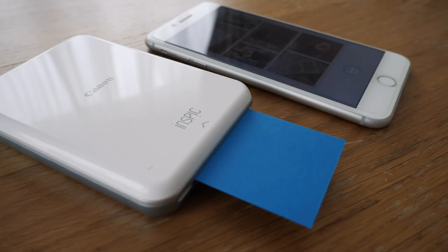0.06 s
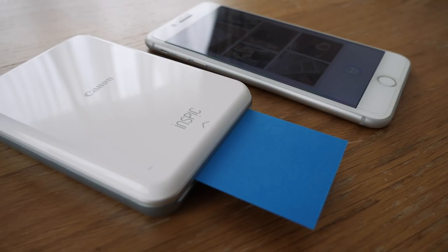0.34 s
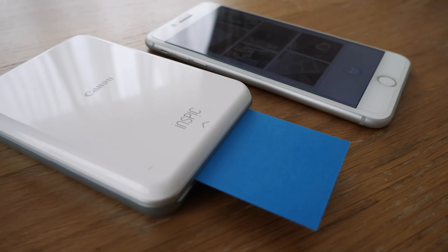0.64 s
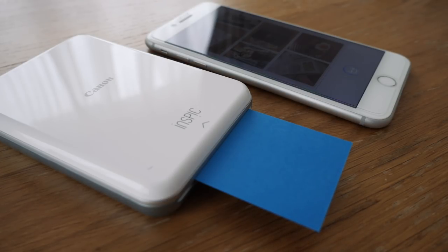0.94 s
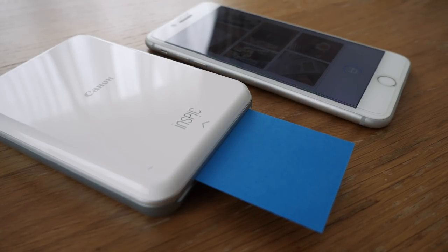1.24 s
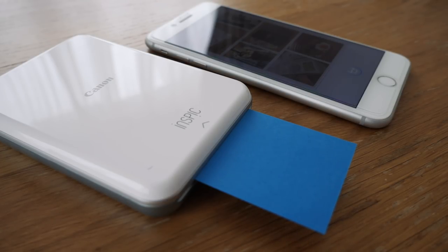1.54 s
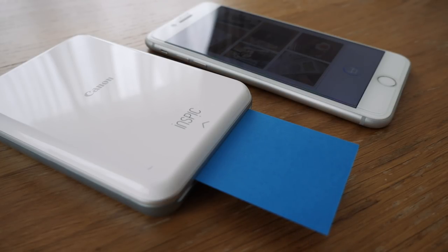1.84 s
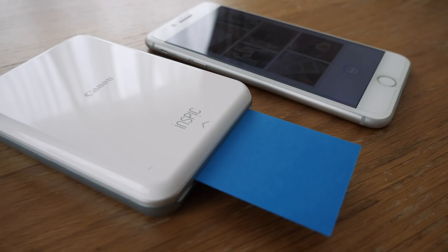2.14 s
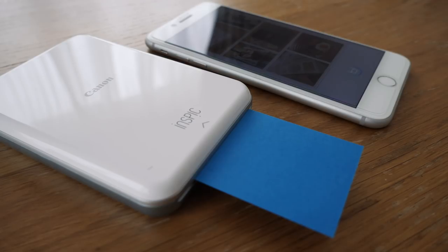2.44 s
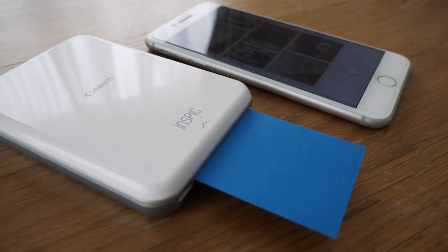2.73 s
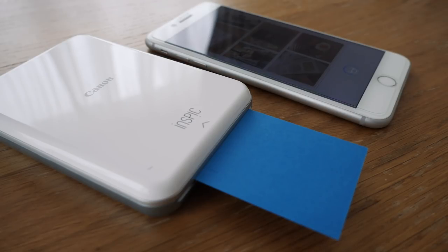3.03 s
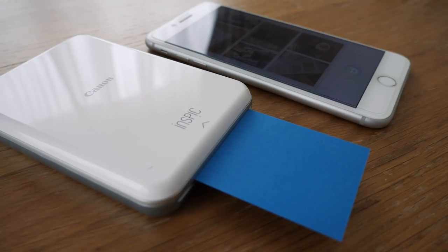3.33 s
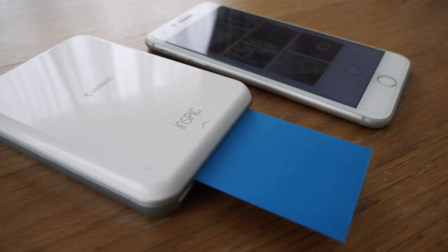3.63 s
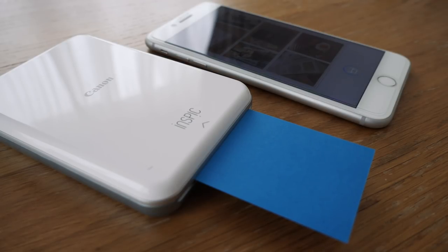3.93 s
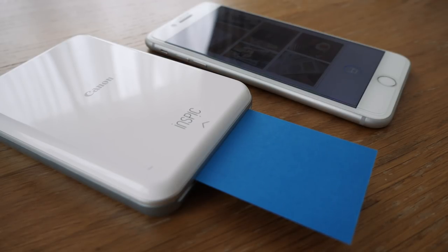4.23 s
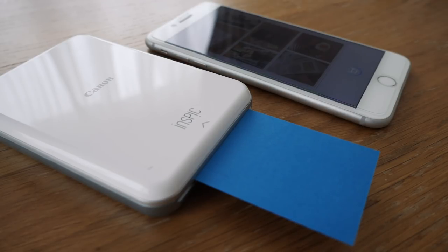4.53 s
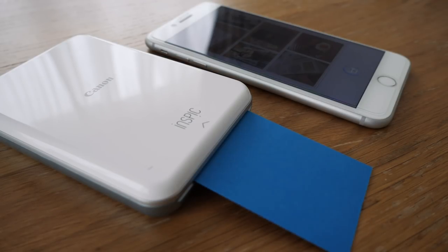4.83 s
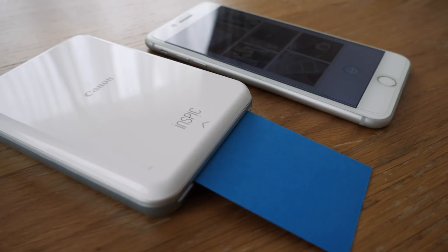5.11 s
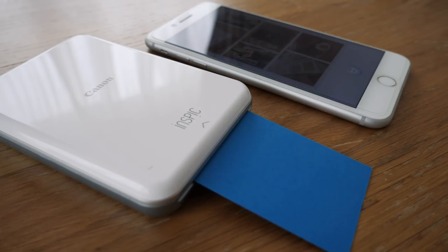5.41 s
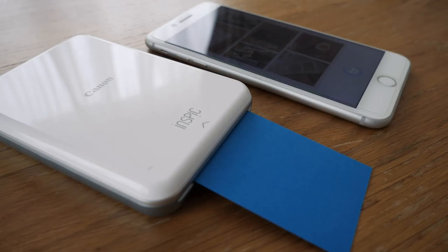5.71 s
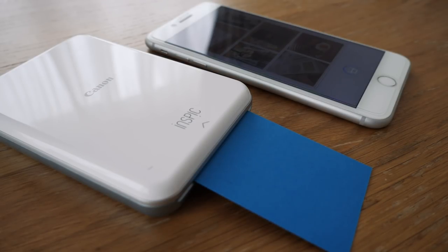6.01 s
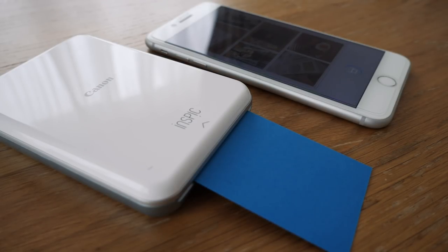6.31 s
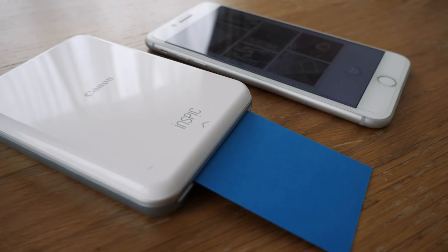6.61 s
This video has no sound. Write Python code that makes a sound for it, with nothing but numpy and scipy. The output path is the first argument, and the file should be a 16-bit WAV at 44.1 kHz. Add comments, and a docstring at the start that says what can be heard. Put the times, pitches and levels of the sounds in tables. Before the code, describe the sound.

A small photo printer whines and rasps steadily, then its gears rattle louder, a sheet drops with a clack, and the motor stops.

```python
"""Pocket photo printer on a wooden table

Close to the microphone, a little to the right, a speed-governed gear train whines and rasps as it feeds
out a sheet. As the sheet leaves the rollers the unloaded gears chatter louder, the sheet drops with a
clack, and the motor stops. Behind it a quiet room hums and gives a short echo."""
import sys
import numpy as np
from scipy import signal
from scipy.fft import rfft, irfft, next_fast_len
from scipy.io import wavfile
from scipy.ndimage import uniform_filter1d, map_coordinates

SR = 44100
rng = np.random.default_rng(int(sys.argv[2]) if len(sys.argv) > 2 else 0)


def wav_record(signal):
    """Record a signal, one row per channel, as 16-bit PCM in the file named by sys.argv[1]."""
    frames = np.transpose(np.atleast_2d(signal))
    bounded = np.clip(frames, -1, 1)
    # unit amplitude maps onto the largest positive 16-bit level
    quanta = np.round(bounded * 32767).astype(np.int16)
    wavfile.write(sys.argv[1], SR, quanta)


N = 302526
TURN_HZ, TEETH = 18.7, 60  # the gear wheel
SLIP_S, FREE_S, STOP_S = 4.635, 4.752, 5.542  # the sheet starts to slip, gears run free, motor is cut


def feeding(turns):
    """The loaded gears run tight: a clear whine over a rasp that rings the case and brightens with drag."""
    # mesh overtones and sidebands under load: (multiple of turn rate, level [dB], left-right [dB])
    partials = [(30, -68.5, -1), (65, -73.5, -3), (78, -73.0, 0), (90, -66.0, 4), (93, -70.0, -2),
                (99, -72.0, -6), (105, -65.5, -3), (108, -69.0, -9), (115, -56.5, -5), (120, -55.5, -5),
                (126, -54.0, -9), (132, -61.0, -7), (145, -69.5, -1), (158, -67.5, -1), (175, -68.0, -9),
                (177, -68.5, -8), (179, -68.5, -4), (180, -64.5, -5), (194, -66.5, -5), (198, -62.5, -5),
                (210, -60.0, -6), (221, -69.5, -8), (226, -71.5, -6), (240, -69.0, 1), (252, -74.5, 1),
                (270, -69.5, -4), (300, -68.5, -1), (330, -73.5, -1), (361, -70.5, -2), (420, -70.0, -2),
                (450, -72.0, 0)]
    # tooth rasp through the plastic case: (frequency [Hz], relative density [dB])
    spectrum = [(250, -29), (600, -17), (930, -21), (1150, -2.5), (1320, -11.5), (1600, -9), (2300, 5),
                (2780, -4), (3600, -0.5), (5300, -10), (8200, -4), (10900, -10), (11500, -14), (15000, -24)]
    # its balance at the microphone: (frequency [Hz], left-right [dB])
    sides = [(60, -4), (130, -5), (290, -6), (640, -1), (1410, -4), (3100, -5), (6820, -1), (15000, 3.0)]
    # case resonances that the loaded gears ring: (frequency [Hz], width [Hz], boost [dB])
    case = [(1936, 54, 5), (3700, 90, 3), (4150, 160, 4.5), (5090, 48, 4.5), (6720, 72, 5),
            (7920, 120, 4.5)]
    # the sheet drags part way through and at its trailing edge: (time [s], half-width [s], strength [0-1])
    drags = [(2.15, .6, 1), (4.4, .1, .4)]
    drag = sum(strength * swell(s, width) for s, width, strength in drags)
    scrape = rasp(turns, spectrum, sides, repeat=.5, bite=.92, uneven_db=.7, scatter_db=.8, patchy_db=1.23)
    scrape = boosted(scrape, case)
    hiss = treble(scrape)
    scrape = amp(-.8 * drag) * (scrape - hiss) + amp(3 * drag) * hiss
    # the fast pinion, the wheel and the slow roller each sway the pressure at their own rate
    pinion, roller = 3 * turns, turns * 2 / 5
    sway = throb(pinion, depth_db=.8) * throb(turns, depth_db=.6) * throb(roller, depth_db=.66)
    tones = whine(turns, partials, waver_db=.8, slack=.18)
    mesh = amp(-53.8 + 1.3 * drag) * whine(turns, [(TEETH, 0, -6.5)], waver_db=.6, slack=.14)
    return grip() * (amp(-48.2) * sway * scrape + amp(.3) * tones + mesh)


def running_free(turns):
    """Unloaded teeth hiss, then rattle in their backlash under a throbbing whine until the motor is cut."""
    # tones of the free gears: (multiple of turn rate, level [dB], left-right [dB])
    partials = [(30, -71.0, 0), (60, -54.0, 1), (63, -60.0, -2), (66, -63.5, 2), (111, -59.0, -6),
                (115, -57.5, -5), (117, -48.5, -9), (120, -47.5, -3), (123, -53.5, -6), (126, -58.0, -5),
                (128, -57.0, -3), (153, -61.0, -5), (174, -58.5, -5), (180, -58.0, -9), (207, -59.5, 1),
                (237, -61.0, -3), (243, -63.0, -4)]
    # their rasp through the case: (frequency [Hz], relative density [dB])
    spectrum = [(250, -30), (650, -13.5), (930, -15), (1180, -0.5), (1350, -8.5), (1900, -2.5), (2250, 8),
                (2550, -2.5), (3300, 0.5), (5300, -6.5), (7700, -3), (11000, -3), (13200, -14),
                (15000, -16)]
    # its balance at the microphone: (frequency [Hz], left-right [dB])
    sides = [(60, 0.0), (130, 0.0), (290, -0.5), (640, -0.5), (1410, -1.5), (3100, -4.0), (6820, -0.5),
             (15000, 3.0)]
    # case resonances and dips: (frequency [Hz], width [Hz], boost [dB])
    case = [(1150, 150, 1.5), (2870, 90, 2), (3780, 160, 1.5), (4500, 130, 2.5), (5600, 600, -1.5),
            (6050, 180, 3), (7480, 300, 3), (9200, 1500, -1.2), (10800, 600, 2.2)]
    scrape = rasp(turns, spectrum, sides, repeat=.33, bite=.93, uneven_db=.5, scatter_db=.7,
                  patchy_db=1.15)
    scrape = throb(turns, depth_db=.24) * boosted(scrape, case)
    tones = throb(turns, depth_db=2.5) * whine(turns, partials, waver_db=1.7, slack=.32)
    free = onset(FREE_S)
    slipping = onset(SLIP_S) - free
    rattle = free * scrape + slipping * amp(-2) * treble(scrape)
    return (amp(-37.4) * release(STOP_S, db_per_s=190) * rattle
            + amp(.5) * free * release(STOP_S, db_per_s=260) * tones)


def wheel(drift):
    """Turns of the gear wheel; the governor holds its speed almost constant."""
    return np.cumsum(TURN_HZ * (1 + drift * wobble(25))) / SR


def whine(turns, tones, waver_db, slack):
    """Mesh tones and their sidebands; each wavers in strength and phase, the high ones more."""
    out = np.zeros((2, N))
    for order, db, side_db in tones:
        looseness = np.sqrt(order / TEETH)
        phase = 2 * np.pi * (order * turns + rng.random()) + slack * looseness * wobble(22)
        waver = amp(waver_db * looseness * wobble(7))
        out += panned(side_db)[:, None] * amp(db) * unit(waver * np.sin(phase))
    return out


def rasp(turns, spectrum, sides, repeat, bite, uneven_db, scatter_db, patchy_db):
    """Each tooth scrapes once per mesh; a share of the scrape is its own surface and returns every turn."""
    # the printer's stereo image at the microphone: (frequency [Hz], left-right likeness [0-1])
    alike = [(60, 0.74), (150, 0.66), (380, 0.61), (950, 0.78), (2380, 0.64), (5980, 0.83), (15000, 0.43)]
    points = round(SR / TURN_HZ)
    surface = signal.resample(rng.standard_normal((2, points)), points * 8, axis=1)
    worn = surface[:, (turns % 1 * surface.shape[1]).astype(int)]
    scrape = np.sqrt(repeat) * worn + np.sqrt(1 - repeat) * rng.standard_normal((2, N))
    tooth = (turns * TEETH).astype(int)
    force_db = uneven_db * rng.standard_normal(TEETH)[tooth % TEETH]  # some teeth always press harder
    force_db += scatter_db * rng.standard_normal(N)[tooth]  # no two contacts are quite alike
    contact = np.exp(-bite * (turns * TEETH % 1)) * amp(force_db)
    chatter = patchy(scrape * contact, patchy_db, bins=8, frames=7)
    chatter = coloured(chatter, spectrum, alike)
    return filtered(chatter, lambda hz: panned(along(sides, hz)) * hz / np.hypot(hz, 120))


def rubbing(turns, depth_db):
    """In spells, one flank of the wheel brushes past every turn with a short chirp."""
    # spells of rubbing over a light steady touch: (time [s], half-width [s], level [dB])
    spells = [(.48, .25, -57.5), (2, .45, -59), (2.78, .17, -55.5), (3.12, .13, -54), (3.58, .1, -58)]
    # resonances that the flank rings: (frequency [Hz], width [Hz], relative level [dB])
    flank = [(3330, 130, 0), (3600, 140, -4), (4150, 200, -8)]
    ring = filtered(rng.standard_normal(N), lambda hz: resonant(hz, flank) * np.exp(-(hz / 5000) ** 8))
    chirps = unit(throb(turns, depth_db) * ring)
    return grip() * swelling(spells, rest_db=-71) * chirps * panned(side_db=-8.5)[:, None]


def throb(turns, depth_db):
    """A wheel runs slightly off centre and presses harder once a turn."""
    return amp(depth_db * np.cos(2 * np.pi * turns))


def grip():
    """The rollers hold the sheet; the loaded sound outlasts the slip a moment, then fades."""
    return release(SLIP_S + .045, db_per_s=130)


def sheet_drop():
    """Each blow is a snap and a short rattle that ring the stiff sheet and case, and a thud on the table."""
    # the sheet snaps free and lands: (time [s], level [dB], thud re level [dB], rattle t60 [s])
    clacks = [(4.828, -34, -7, .03), (4.8675, -33, -5, .025), (4.874, -19.5, -26, .012),
              (4.881, -35, -14, .05), (4.896, -35, -14, .07), (4.917, -43, -3, .05), (4.951, -44, -8, .04)]
    # resonances of sheet and case: (frequency [Hz], width [Hz], relative level [dB])
    modes = [(1140, 125, -12), (2200, 220, -6), (2880, 136, 4), (3180, 240, -6), (3800, 500, -17.5),
             (7950, 3800, -24.5)]
    # the wooden table's answer: (frequency [Hz], relative density [dB])
    wood = [(50, -55), (150, -20), (320, -6), (480, -3.5), (600, 1), (800, -4.5), (1400, -7), (3000, -33)]
    snaps, thuds = np.zeros((2, N)), np.zeros((2, N))
    t = np.arange(SR // 4) / SR
    for s, db, thud_db, t60 in clacks:
        start = round(s * SR)
        burst = rng.standard_normal((2, len(t)))
        snaps[0, start] += amp(db + 21)
        snaps[:, start:start + len(t)] += amp(db - 60 * t / t60) * burst
        thuds[:, start:start + len(t)] += amp(db + thud_db - 60 * t / .12) * burst
    ring = filtered(snaps, lambda hz: unit(resonant(hz, modes)))
    mid, side = ring + filtered(thuds, lambda hz: unit(amp(along(wood, hz))))
    return np.array([mid + .26 * side, mid - .34 * side]) * panned(side_db=-3)[:, None]


def room(x):
    """The room's echo: each frequency dies at its own speed."""
    # reverberation time: (frequency [Hz], t60 [s])
    decay = [(200, 0.48), (2000, 0.34), (10000, 0.2)]
    hz, t, noise = signal.stft(rng.standard_normal((2, SR // 2)), SR, nperseg=256)
    tail = signal.istft(noise * amp(-60 * t / along(decay, hz)[:, None]), SR, nperseg=256)[1]
    return signal.fftconvolve(x, tail / np.linalg.norm(tail[0]), axes=1)[:, :N]


def room_tone():
    """Soft noise around the microphone, and a low hum in the room's resonances that swells twice."""
    # the room's noise: (frequency [Hz], relative density [dB])
    spectrum = [(25, -41), (65, -37), (95, -12.5), (140, -7.5), (210, -12), (255, -8.5), (310, -11.5),
                (456, -6.5), (600, -17.5), (1000, -11.5), (1570, -13.5), (2170, -19), (9500, -22.5),
                (15000, -30.5)]
    # its stereo image: (frequency [Hz], left-right likeness [0-1])
    alike = [(60, 0.9), (180, 0.95), (550, 0.9), (1650, 0.49), (4970, 0.38), (15000, 0.57)]
    # low room resonances: (frequency [Hz], width [Hz], relative level [dB])
    modes = [(144.6, 14, 0.5), (257, 21, -7)]
    # swells of the hum: (time [s], half-width [s], level [dB])
    swells = [(5.45, .45, -71.5), (6.61, .03, -61)]
    air = coloured(rng.standard_normal((2, N)), spectrum, alike)
    peaks = lambda hz: sum(amp(db) * np.exp(-((hz - centre) / width) ** 2) for centre, width, db in modes)
    hum = unit(filtered(rng.standard_normal(N), peaks))
    return amp(-63 + .58 * wobble(5)) * air + swelling(swells, rest_db=-77.5) * hum


def amp(db):
    """Decibels to gain."""
    return np.exp(np.asarray(db) * (np.log(10) / 20))


def unit(x):
    """x scaled to rms 1."""
    return x / np.sqrt(np.mean(abs(x) ** 2) + 1e-20)


def along(points, hz):
    """(frequency [Hz], value) points joined on a log axis."""
    freqs, values = np.transpose(points)
    return np.interp(np.log(hz + 1), np.log(freqs + 1), values)


def wobble(rate):
    """A smooth random curve, rate knots a second."""
    coarse = np.arange(0, N + 64, 64)
    knots = rng.standard_normal(int(N * rate / SR) + 4)
    return np.interp(np.arange(N), coarse, map_coordinates(knots, [coarse * rate / SR], mode="nearest"))


def filtered(x, response):
    """x times a response of frequency."""
    size = next_fast_len(N + SR // 2)
    return irfft(rfft(x, size) * response(np.fft.rfftfreq(size, 1 / SR)), size)[..., :N]


def panned(side_db):
    """Left and right gains of constant total power."""
    gains = amp([side_db / 2, -side_db / 2])
    return gains / np.sqrt(np.mean(gains ** 2, axis=0))


def coloured(pair, spectrum, alike):
    """Two unrelated signals become a stereo sound of rms 1 with this spectrum and likeness."""
    def response(hz):
        angle = np.arccos(np.clip(along(alike, hz), -1, 1)) / 2
        return amp(along(spectrum, hz)) * [np.cos(angle), np.sin(angle)]
    mid, side = filtered(pair, response)
    return unit(np.array([mid + side, mid - side]))


def patchy(x, depth_db, bins, frames):
    """Each region of the spectrum swells and fades on its own for a few hundredths of a second."""
    spectra = signal.stft(x, nperseg=256)[2]
    field = uniform_filter1d(rng.standard_normal(spectra.shape[1:]), bins, axis=0)
    field = uniform_filter1d(field, frames, axis=1)
    return signal.istft(spectra * amp(depth_db * unit(field)), nperseg=256)[1][:, :N]


def resonant(hz, modes):
    """Complex response of modes that alternate in sign."""
    return sum((-1) ** k * amp(db) * 1j * hz * width / (centre ** 2 - hz ** 2 + 1j * hz * width)
               for k, (centre, width, db) in enumerate(modes))


def boosted(x, peaks):
    """x coloured by bell-shaped peaks and dips."""
    boost_db = lambda hz: sum(db / (1 + (2 * (hz - centre) / width) ** 2) for centre, width, db in peaks)
    return filtered(x, lambda hz: amp(boost_db(hz)))


def treble(x, above_hz=3200):
    """The hissing upper part of a rasp."""
    return filtered(x, lambda hz: 1 - np.exp(-(hz / above_hz) ** 2))


def seconds():
    """The time of every sample."""
    return np.arange(N) / SR


def onset(centre_s, rise_s=.05):
    """Gain that rises from 0 to 1 around a change of load."""
    return np.clip((seconds() - centre_s) / rise_s + .5, 0, 1)


def release(end_s, db_per_s):
    """Gain that holds at 1, then dies away."""
    return amp(-db_per_s * np.maximum(seconds() - end_s, 0))


def swell(centre_s, width_s):
    """A bell-shaped rise and fall with a top of 1."""
    return np.exp(-((seconds() - centre_s) / width_s) ** 2)


def swelling(swells, rest_db):
    """Gain of a resting level with swells on top."""
    return amp(rest_db) + sum(amp(db) * swell(s, width) for s, width, db in swells)


def scene():
    """The gears and the falling sheet up close, their echo and the quiet room behind."""
    turns = wheel(drift=.0003)
    gears = feeding(turns) + rubbing(turns, depth_db=5.5) + running_free(turns)
    clack = sheet_drop()
    echo = room(amp(-18) * gears + amp(-8) * clack)
    return gears + clack + echo + room_tone()


def record(dry):
    """The camera keeps nothing from its microphone above its band limit."""
    return filtered(dry, lambda hz: hz < 15250)


dry = scene()
out = record(dry)
wav_record(out)
```